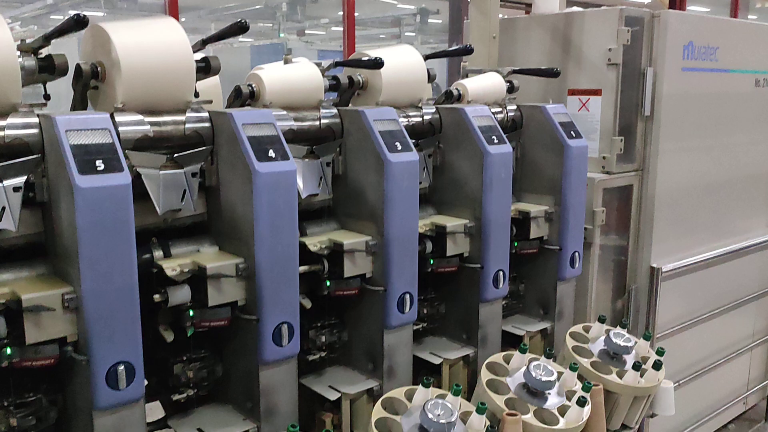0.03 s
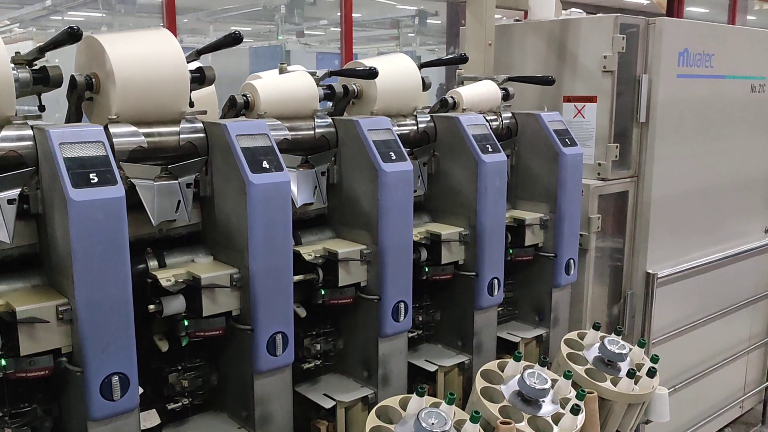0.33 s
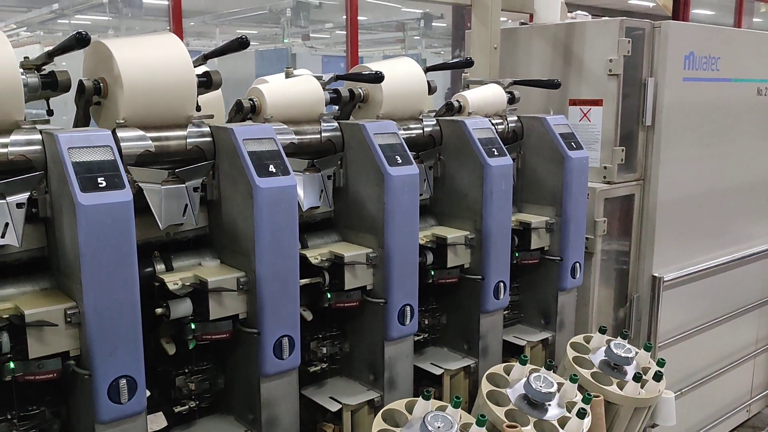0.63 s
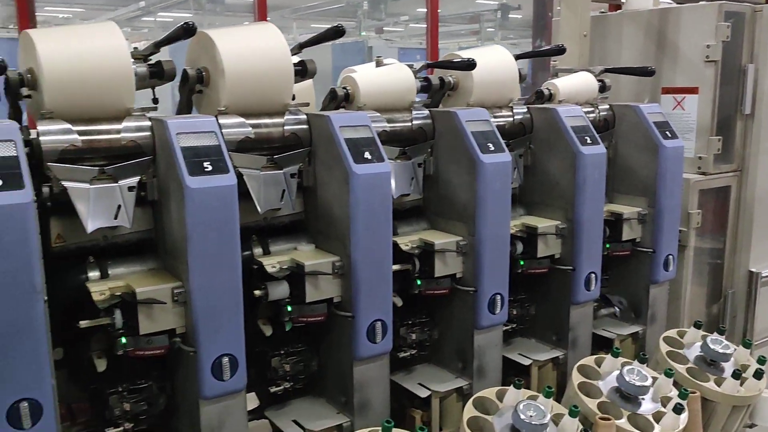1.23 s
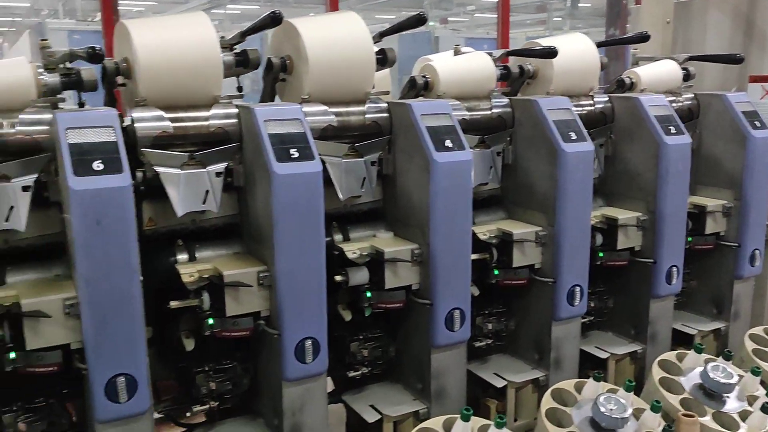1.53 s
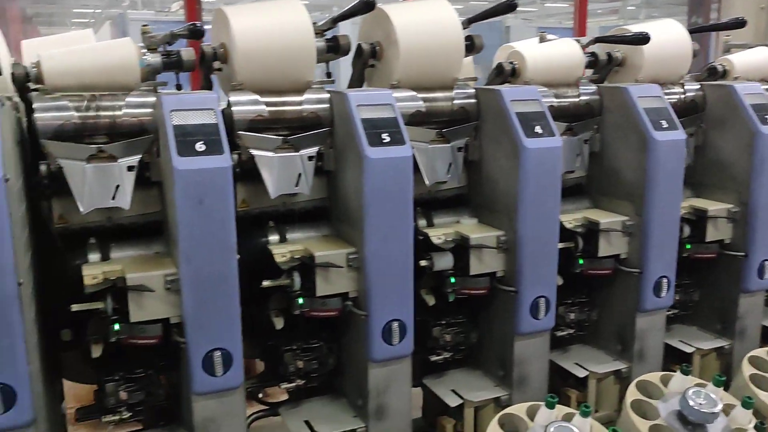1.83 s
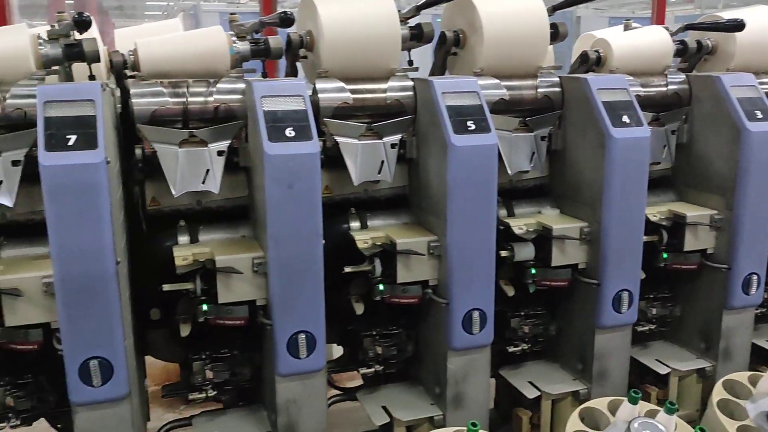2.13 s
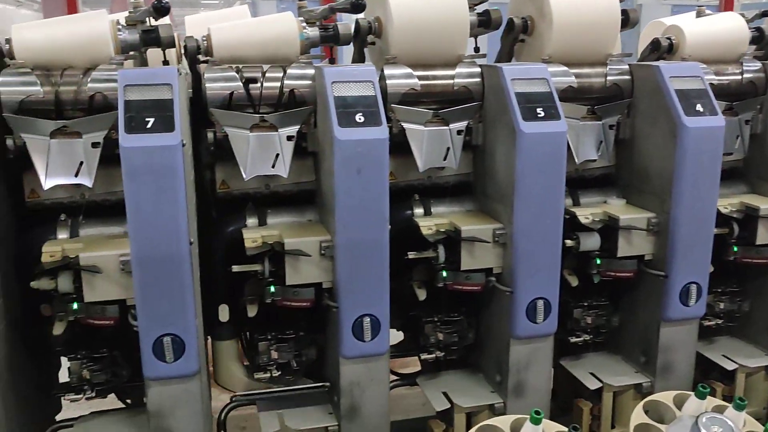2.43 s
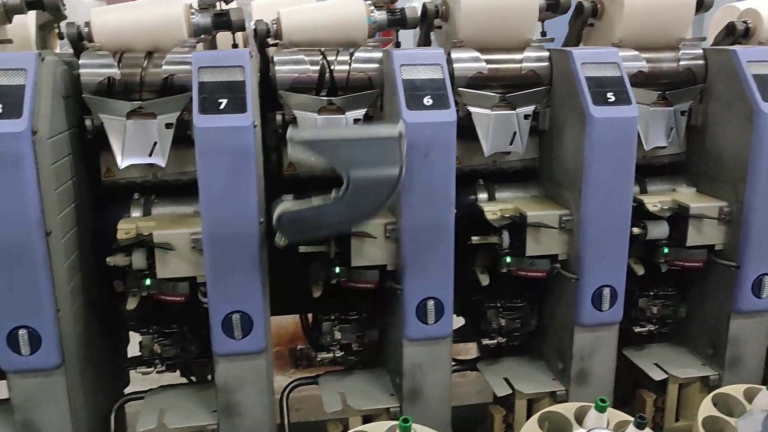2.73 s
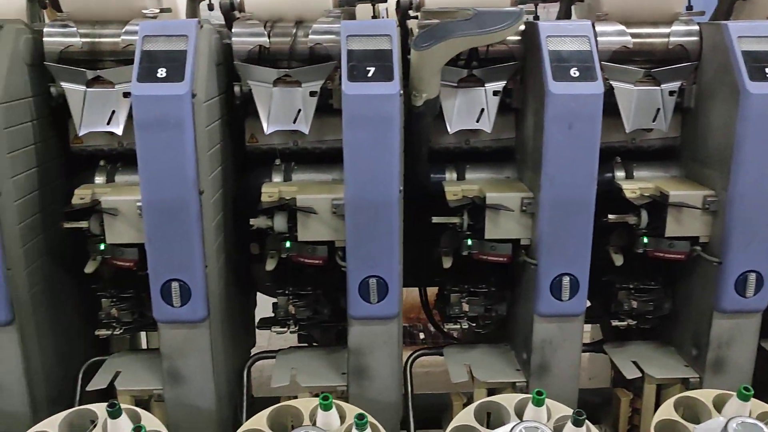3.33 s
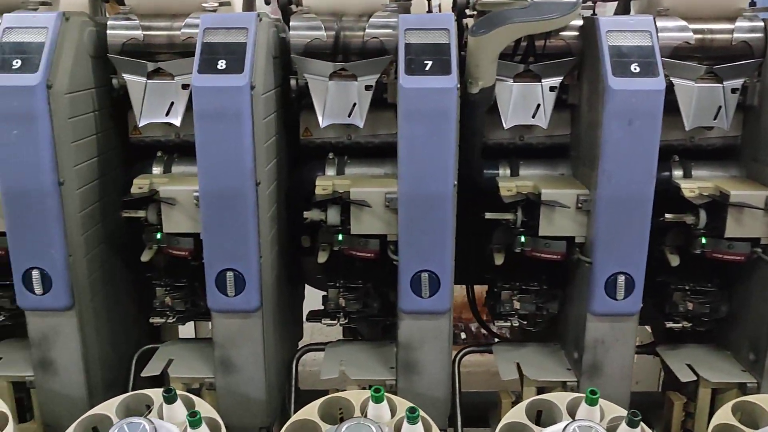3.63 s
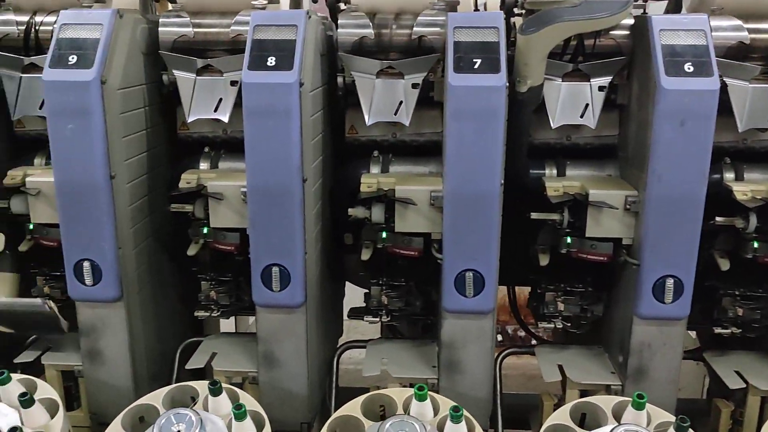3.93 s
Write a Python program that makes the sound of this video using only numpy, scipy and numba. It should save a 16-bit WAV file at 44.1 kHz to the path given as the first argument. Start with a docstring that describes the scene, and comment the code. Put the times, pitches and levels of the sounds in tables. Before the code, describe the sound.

A row of yarn winders runs loudly, its hiss and clatter cut by compressed air bursts.

```python
"""A row of yarn winders runs in a big mill hall, heard from a phone carried slowly along the aisle.
The sound fades in: drums hum and beat, yarn guides rattle, and suction hisses over the hall's roar.
From 0.4 s on, six short blasts of compressed air cut in; the phone turns itself down for the loud ones.
Near 2.8 s, before the last blast, the clatter flares and a frame throbs. The machines run to the end."""
import sys
import numpy as np
from scipy import signal
from scipy.fft import rfft, irfft
from scipy.io import wavfile
from scipy.ndimage import uniform_filter1d, minimum_filter1d
from numba import njit

SR = 44100
rng = np.random.default_rng(int(sys.argv[2]) if len(sys.argv) > 2 else 0)


def dump_mix(stems):
    """Bounce the given channels to the path in sys.argv[1] as a 16-bit WAV at rate SR."""
    frames = np.atleast_2d(stems).T  # one column per channel
    limited = np.clip(frames, -1, 1)  # hard clip at full scale
    pcm = np.round(limited * 32767).astype(np.int16)
    wavfile.write(sys.argv[1], SR, pcm)


N = 176400  # 4 seconds

# Tones of the shafts and drums: pitch_hz, level_db
SHAFT_TONES = [(48.4, -41), (145.3, -39.5), (268.5, -39.5), (277, -36.5), (511, -45), (727, -66),
               (825, -45)]
# How loud the nearest drums hum: time_s, level_db
DRUM_LEVEL = [(0, -28.5), (.82, -27.5), (1.1, -27), (1.5, -26), (2, -25.5), (2.3, -30.5), (2.78, -28),
              (3.2, -29), (4, -31)]
# How loud the machine's frame rings: time_s, level_db
FRAME_LEVEL = [(0, -45), (.85, -32), (1.35, -28), (1.6, -23.5), (1.8, -34), (2.7, -30), (2.78, -18.5),
               (2.87, -32), (4, -29)]
def drums():
    """Spinning drums and shafts waver and beat; the frame throbs as the yarn is swept to and fro."""
    frame_hz, frame_width_hz, sweep_hz, throb_depth = 267, 84, 27.22, 0.82
    hum = tone(hz=242.2, db=curve(DRUM_LEVEL), wander_db=-0.35, drift=0.001)
    hum += sum(tone(hz, db, wander_db=1.9, drift=0.00199) for hz, db in SHAFT_TONES)
    frame = ring(rng.standard_normal(N), frame_hz, frame_width_hz)
    frame = ring(frame, frame_hz, frame_width_hz)
    throb = 1 + throb_depth * np.sin(spin(sweep_hz, drift=0.039))
    return hum + level(frame * throb, 0) * undb(curve(FRAME_LEVEL))


# Pitches at which the guides and bobbins ring: pitch_hz, width_hz, level_db
GUIDE_RINGS = [(543, 72, -2), (774, 72, -2.5), (1360, 720, -1.5), (2100, 570, 0), (4260, 1700, -10),
               (9200, 2900, -5)]
# Single harder clacks: time_s, above_normal_tick_db
CLACKS = [(1.417, 5), (2.572, 8), (2.939, 7), (3.282, 5), (3.313, 6), (3.333, 2), (3.367, 0), (3.737, 12)]
# Moments of louder clatter: middle_s, half_length_s, boost_db
CLATTER = [(1.03, 0.058, 2), (1.147, 0.021, 5), (1.533, .05, 3), (2.76, 0.053, 7), (3.36, .035, 7.5),
           (3.93, .05, 4)]
def rattle():
    """Yarn guides tick at every stroke, with a few harder clacks; each hit makes the parts ring."""
    stroke_rates_hz, jitter, scatter_db, decay_s = [46.3, 54.1, 71.43], 0.12, 1, 0.0035
    t, ticks = np.arange(N) / SR, np.zeros((2, N))
    for hz in stroke_rates_hz:
        stroke_count = np.floor(rng.random() + np.cumsum(hz * (1 + jitter * wander(30))) / SR)
        strength = undb(scatter_db * rng.standard_normal(N))
        ticks += np.diff(stroke_count, prepend=stroke_count[0]) * strength
    for when, db in CLACKS:
        ticks[:, int(when * SR)] += undb(db)
    # Each tick becomes a tiny burst of noise that dies away.
    power = signal.lfilter([1], [1, -np.exp(-2 / (decay_s * SR))], ticks ** 2)
    bursts = np.sqrt(power) * rng.standard_normal((2, N))
    ringing = sum(undb(db) * ring(bursts, hz, width) for hz, width, db in GUIDE_RINGS)
    boost_db = sum(db * np.exp(-((t - when) / half_length) ** 2) for when, half_length, db in CLATTER)
    return panel_echoes(level(hall_spread(ringing), -28.5)) * undb(boost_db)


# Strength of the hiss from low to high: pitch_hz, level_db
HISS_COLOUR = [(500, -36), (1500, -21), (2900, -5.5), (3800, -0.5), (4150, 1), (5200, 0), (6700, -.5),
               (8100, 3), (9300, -0.5), (11000, -1), (12800, 1), (14500, -8.5)]
# How the hiss swells and dips: time_s, change_db
HISS_LEVEL = [(.22, -0.5), (.35, 0.5), (1.05, 0.1), (1.38, -1.5), (1.53, 0), (1.76, -1.5), (2, -.3),
              (2.3, -2), (2.5, 2), (2.655, -2.5), (2.76, 0.3), (3.02, 2.1), (3.27, -3), (3.36, 1.5),
              (3.6, -2), (3.7, -3.5), (3.77, -1), (4, -0.3)]
def suction():
    """Air sucked into the yarn traps and yarn running over the drums make a flickering hiss."""
    wander_db, flicker_db = 0.46, 0.44
    hiss = panel_echoes(colour(rng.standard_normal((2, N)), HISS_COLOUR))
    change_db = curve(HISS_LEVEL) + wander_db * wander(7.9) + flicker_db * wander(60)
    return level(hiss, -15) * undb(change_db)


# Blasts of air: start_s, length_s, level_db, lowest_hz, highest_hz, left_over_right_db, push_db
BLASTS = [(0.403, 0.13, -12, 6000, 18100, -0.5, -15), (1.19, 0.13, -11.5, 6850, 18000, -0.5, -20.5),
          (1.55, 0.13, -20, 9000, 18000, -2, -45), (2.028, .215, -15, 4400, 18000, 0, -30),
          (2.399, 0.14, -19, 1000, 9000, 1.5, -40), (3.412, 0.235, -14.5, 5000, 18000, 2, -32)]
# Nozzle whistles, each lasting the whole blast that its time falls in:
# time_s, pitch_hz, width_hz, level_against_jet_db, slide_hz_per_s
WHISTLES = [(.47, 4300, 579, -7.5, -3), (.47, 5360, 300, -10, 0), (.47, 6330, 1100, -8, -3),
            (.47, 8000, 1700, -1, -1000), (.47, 11900, 700, -12, 0), (.47, 13100, 500, -12, 0),
            (1.25, 3930, 448.4, -17, 2), (1.25, 5300, 900, -17, 1), (1.25, 7380, 1000, -6.5, -4000),
            (1.25, 8960, 1500, -9, -2), (1.25, 12200, 1000, -10, 2), (2.14, 4830, 400, -11, 0),
            (2.14, 5606, 800, -11.5, 0.5), (2.47, 2356, 380, -4.5, 0), (2.47, 4155, 400, -4, -500),
            (2.47, 4900, 500, -9, 0.5), (3.52, 6270, 298, -15, -0.5), (3.52, 11600, 1500, -11, -1)]
def air_blasts():
    """A valve lets out a bright, whistling jet; the air bumps the microphone as it starts and stops."""
    open_s, close_s, sag_to = 0.0061, 0.019, 0.83
    knock_delay_s, knock_width_s, knock_db = 0.015, 0.0075, 5.5
    rebound_delay_s, rebound_width_s, rebound_db = 0.027, 0.011, -5
    t, out = np.arange(N) / SR, 0
    for start, length, db, low_hz, high_hz, pan_db, push_db in BLASTS:
        end = start + length
        valve = curve([(start, 0), (start + open_s, 1), (end, sag_to), (end + close_s, 0)])
        band = signal.butter(2, [low_hz, high_hz], "bandpass", fs=SR, output="sos")
        jet = level(signal.sosfilt(band, rng.standard_normal((2, N))), 0)
        for when, hz, width, whistle_db, slide in WHISTLES:
            if start < when < end:
                pitch_hz = hz + slide * (np.clip(t, start, end) - when)
                jet += level(whistle(pitch_hz, width), whistle_db)
        knock = undb(knock_db) * np.exp(-((t - start - knock_delay_s) / knock_width_s) ** 2)
        rebound = undb(rebound_db) * np.exp(-((t - end - rebound_delay_s) / rebound_width_s) ** 2)
        push = ring(valve, hz=6.5, width_hz=12) + knock - rebound
        out = out + panel_echoes(valve * jet) * undb(db) * pan(pan_db) - undb(push_db) * push
    return out


def whistle(hz, width_hz):
    """Swirling air rings in a nozzle: a narrow band of noise whose pitch can slide."""
    smoothing = signal.butter(2, width_hz / 3, fs=SR, output="sos")
    swirl = signal.sosfilt(smoothing, rng.standard_normal((2, 2, N)))
    phase = 2 * np.pi * np.cumsum(hz) / SR
    return swirl[0] * np.cos(phase) + swirl[1] * np.sin(phase)


# Strength of the roar from low to high: pitch_hz, level_db
ROAR_COLOUR = [(20, -24), (36, -7), (50, 0.5), (65, -1), (95, 0.5), (150, 1), (195, -3.5), (225, -2),
               (320, -1.7), (450, -5.5), (620, -6), (780, -5), (950, -8.5), (1400, -9), (2050, -6),
               (2800, -11.5), (5000, -16), (15000, -38)]
def roar():
    """The hall blurs hundreds of spindles into one deep noise."""
    flicker_db = 0.77
    noise = colour(hall_spread(rng.standard_normal((2, N))), ROAR_COLOUR)
    return level(noise * undb(flicker_db * wander(40)), -18.5)


def panel_echoes(pair):
    """Metal machine fronts send back quick echoes, whose delays shift as the phone moves."""
    delays_s, sway_s, echo_db = [0.0023, 0.0041, 0.0067], 0.00008, -9
    n = np.arange(N)
    echo = lambda x, delay: np.interp(n - SR * (delay + sway_s * wander(2)), n, x)
    return np.array([x + undb(echo_db) * sum(echo(x, delay) for delay in delays_s) for x in pair])


def hall_spread(pair, alike_below_hz=556):
    """In a hall, left and right sound alike in the bass and unrelated in the treble."""
    alike = np.exp(-(np.fft.rfftfreq(N, 1 / SR) / alike_below_hz) ** 2 / 2)
    mid = rfft(pair[0]) * np.sqrt(1 + alike)
    side = rfft(pair[1]) * np.sqrt(1 - alike * 0.96)
    return irfft(np.array([mid + side, mid - side]), N)


def tone(hz, db, wander_db, drift):
    """A pure tone that wavers in loudness and pitch."""
    return undb(db + wander_db * wander(3.94)) * np.sqrt(2) * np.sin(spin(hz, drift))


def spin(hz, drift):
    """The angle of a turning part whose speed strays by about the fraction `drift`."""
    return 2 * np.pi * np.cumsum(hz * (1 + drift * wander(4.08))) / SR


def wander(rate_hz):
    """A smooth random wobble, about 1 in size."""
    hold = int(SR / rate_hz)
    steps = np.repeat(rng.standard_normal(N // hold + 1), hold)
    return level(uniform_filter1d(uniform_filter1d(steps, hold), hold)[:N], 0)


def ring(x, hz, width_hz):
    """Make a sound ring by keeping only what lies near one pitch."""
    return signal.lfilter(*signal.iirpeak(hz, hz / width_hz, fs=SR), x)


def colour(x, rows):
    """Turn pitches up or down along (pitch_hz, level_db) points."""
    hz, db = np.array(rows).T
    bins_hz = np.maximum(np.fft.rfftfreq(N, 1 / SR), 1)
    return irfft(rfft(x) * undb(np.interp(np.log(bins_hz), np.log(hz), db)), N)


def curve(rows):
    """Join (time_s, value) points with straight lines."""
    return np.interp(np.arange(N) / SR, *np.array(rows).T)


def undb(db):
    """Turn decibels into a number to multiply by."""
    return 10 ** (np.asarray(db) / 20)


def level(x, db):
    """Set a sound's average (rms) level."""
    return x * undb(db) / np.sqrt(np.mean(x ** 2))


def pan(db):
    """Gains that make the left side `db` louder than the right."""
    return undb(np.array([[db], [-db]]) / 2)


# How the roar and rattle swell and dip together: time_s, change_db
MACHINE_LEVEL = [(0, -2.5), (.35, -1.5), (.92, 0), (1.03, 2.5), (1.17, -1), (1.35, 0), (1.53, 1.4),
                 (1.9, 0.4), (2.25, -1.5), (2.45, 0.5), (2.65, -0.9), (2.78, 1.4), (3.15, 1), (3.36, 1),
                 (3.43, 2.2), (3.7, -0.8), (3.95, 2)]
def scene():
    """Roar, rattle and hum sit a touch to the right, with suction and air blasts on top."""
    machines = (roar() + rattle()) * undb(curve(MACHINE_LEVEL)) + drums()
    return machines * pan(-0.5) + suction() + air_blasts()


@njit
def follow(x, attack, release):
    """Track a level, rising at the attack rate and falling at the release rate."""
    out, tracked = np.empty(len(x)), 0.
    for i in range(len(x)):
        tracked += (x[i] - tracked) * (attack if x[i] > tracked else release)
        out[i] = tracked
    return out


def gain_control(x):
    """The phone turns down fast when the sound passes a limit, waits, then eases back up."""
    limit_db, ratio = -12, 23
    sense_s, hold_s, attack_s, release_s = 0.012, 0.063, 0.0013, 0.058
    power = np.mean(x ** 2, axis=0)
    loudness = np.sqrt(np.abs(uniform_filter1d(power, int(sense_s * SR))))
    hold = int(hold_s * SR)
    recent_peak = -minimum_filter1d(-loudness, hold, origin=(hold - 1) // 2)
    tracked = follow(recent_peak, 1 / (attack_s * SR), 1 / (release_s * SR))
    return np.maximum(tracked / undb(limit_db), 1) ** (1 / ratio - 1)


# How the two microphone holes colour the sound: pitch_hz, left_db, right_db
MIC_HOLES = [(100, -2.5, -1.5), (1020, -0.5, 1), (2000, 1.14, -0.65), (2950, -1.5, 0.9), (4240, 0, -.5),
             (6670, 1.5, 0.9), (7400, 3, 0), (8220, 4, -1.5), (9300, -4, 2), (10360, -2, -0.1),
             (11300, -4, -3), (14100, -5, -2)]
# The opening rise from silence: time_s, gain
FADE_IN = [(.077, 0), (.085, 0.093), (.13, 0.33), (.22, 0.59), (.33, 0.89)]
def record(dry):
    """The phone colours the sound, ducks under loud blasts, fades in and cuts the highest treble."""
    boost_db, top_hz = 1.1, 14250
    holes = np.array(MIC_HOLES)
    x = np.array([colour(dry[0], holes[:, [0, 1]]), colour(dry[1], holes[:, [0, 2]])])
    x = x * gain_control(x) * undb(boost_db) * curve(FADE_IN)
    return signal.sosfilt(signal.ellip(12, 0.1, 90, top_hz, fs=SR, output="sos"), x)


dry = scene()
out = record(dry)
dump_mix(out)
```